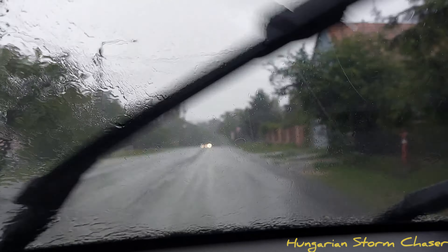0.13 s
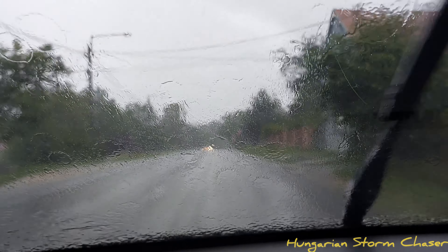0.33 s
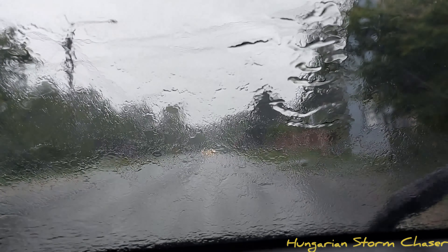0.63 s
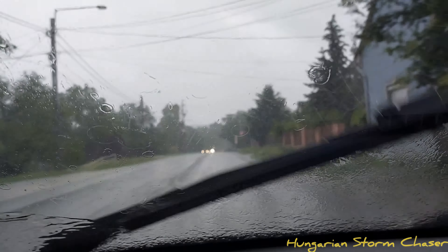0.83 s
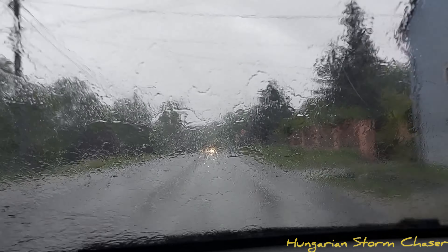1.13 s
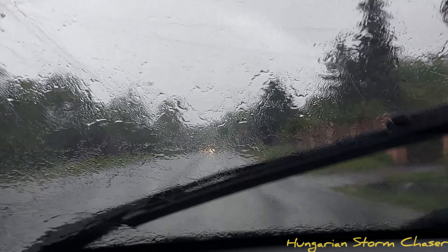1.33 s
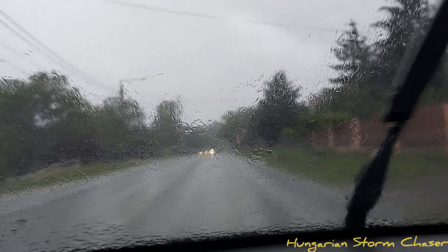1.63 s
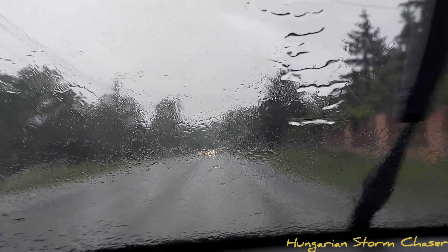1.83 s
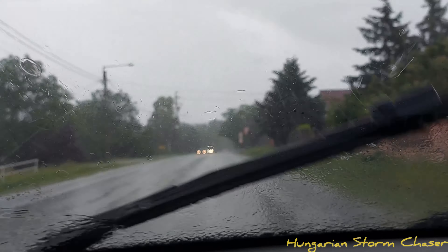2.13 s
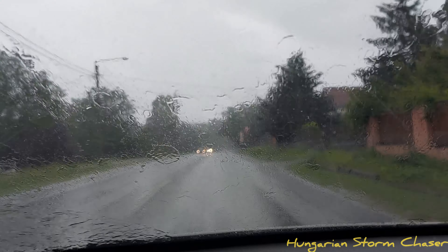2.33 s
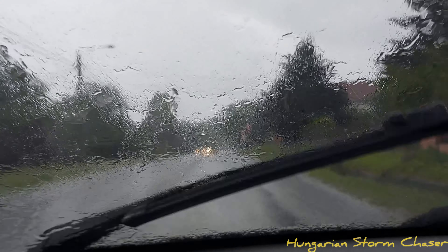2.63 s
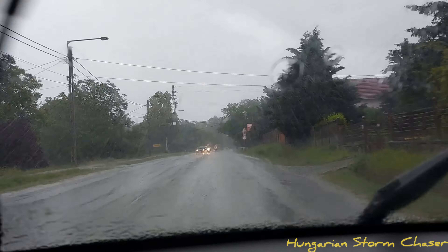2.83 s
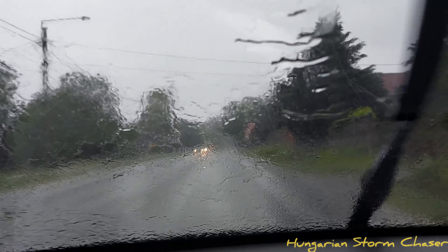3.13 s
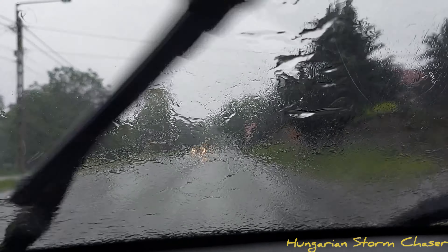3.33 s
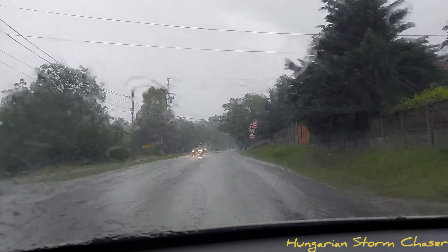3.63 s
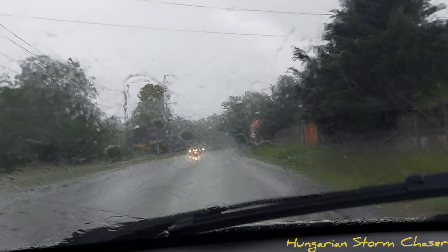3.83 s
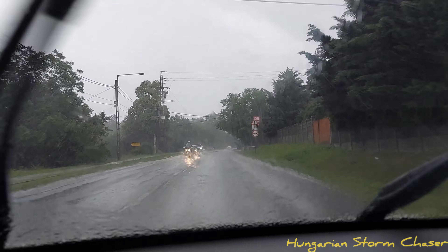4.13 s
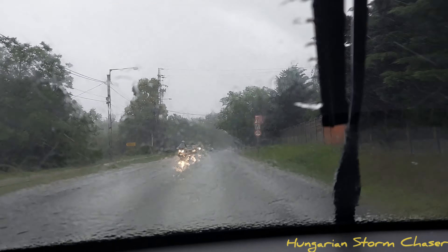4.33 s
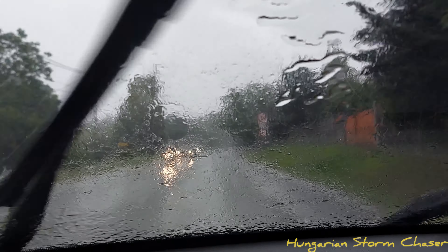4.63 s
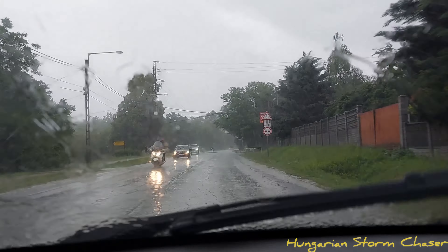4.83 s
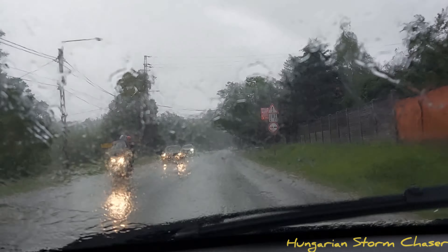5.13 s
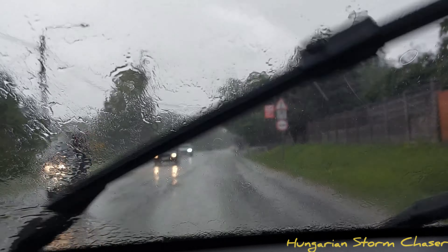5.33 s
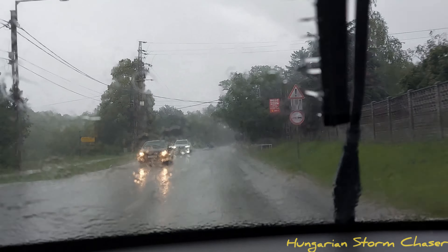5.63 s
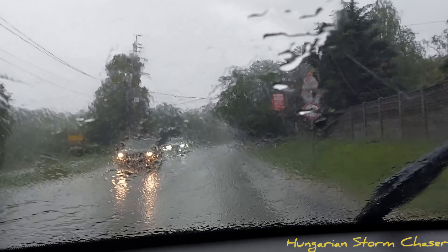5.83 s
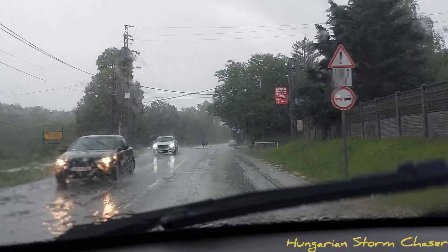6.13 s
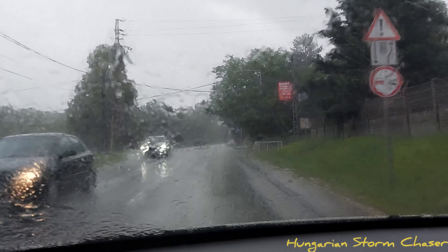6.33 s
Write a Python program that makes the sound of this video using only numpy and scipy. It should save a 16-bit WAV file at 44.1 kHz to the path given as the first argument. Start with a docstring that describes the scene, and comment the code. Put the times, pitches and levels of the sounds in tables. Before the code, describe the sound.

Inside a car driving through heavy rain, dense drops drum on the lined steel roof while fainter, sharper ticks hit the windscreen. Single fat drops snap out irregularly. A steady low engine hum and muffled wet tyre roar run underneath. Rough road booms briefly near two seconds and more strongly near five, each with a dull knock. The microphone is in the cabin, close to the rain, in slightly right-heavy stereo.

```python
"""Heavy rain drums on a car roof and ticks on the windscreen, heard from inside, with single fat drops standing out.
Each drop is a short burst of noise that snaps, cracks and rings; about two thousand land every second.
The engine hums on one steady pitch from three sine tones, its firing tone rising and falling in level.
Below it, filtered noise makes the rumble of the road and the wash of wet tyres. Rough patches boom on a
sinking note, and two dull knocks ring in the car body."""
import sys
import numpy as np
from scipy import signal
from scipy.fft import rfft, irfft, next_fast_len
from scipy.io import wavfile
from scipy.ndimage import uniform_filter1d

SR = 44100
rng = np.random.default_rng(int(sys.argv[2]) if len(sys.argv) > 2 else 0)


def wav_out(sig):
    """Save sig, one row per channel (or a flat mono array), as 16-bit PCM at SR to the path in sys.argv[1]."""
    wavfile.write(sys.argv[1], SR, np.round(np.clip(np.atleast_2d(sig).T, -1, 1) * 32767).astype(np.int16))


N = 285327
T = np.arange(N) / SR  # time of every sample in seconds


def undb(db):
    """Turn decibels into a gain."""
    return 10 ** (np.asarray(db) / 20)


def curves(table):
    """Join the points of each table column by straight lines in time."""
    seconds, *columns = np.transpose(table)
    return [np.interp(T, seconds, column) for column in columns]


def unit(x):
    """Scale a sound to an average (rms) strength of 1."""
    return x / np.sqrt(np.mean(x ** 2))


def colour(points, hz):
    """Read the gain at any frequency from a tone-colour table of Hz and dB."""
    point_hz, point_db = np.transpose(points)
    return undb(np.interp(np.log(hz + 1), np.log(point_hz), point_db))


def shape(x, gain):
    """Filter a sound by a gain for each frequency, with no echo ahead of the sound (minimum phase)."""
    size = next_fast_len(x.shape[-1] // 2 + 4096) * 2
    hz = np.arange(size // 2 + 1) * SR / size
    cepstrum = irfft(np.log(gain(hz) + 1e-6))
    # folding the second half onto the first moves all the response after time zero
    cepstrum[1:size // 2] *= 2
    cepstrum[size // 2 + 1:] = 0
    response = np.exp(rfft(cepstrum))
    return irfft(rfft(x, size) * response, size)[..., :x.shape[-1]]


def walk(rate):
    """Drift at random: levels drawn `rate` times a second, smoothed twice and scaled to rms 1."""
    hold = max(int(SR / rate), 2)
    steps = np.repeat(rng.standard_normal(N // hold + 1), hold)
    smooth = uniform_filter1d(uniform_filter1d(steps, hold), hold)
    return unit(smooth[:N])


def diffuse(pair, alike_hz):
    """Send two unrelated sounds left and right; long waves (low notes) reach both sides alike."""
    def likeness(hz):
        return 1 / (1 + (hz / alike_hz) ** 2) ** 2
    mid = shape(pair[0], lambda hz: np.sqrt(1 + likeness(hz)))
    side = shape(pair[1], lambda hz: np.sqrt(1 - likeness(hz)))
    return np.array([mid + side, mid - side])


def splat(crack_s, ring_t60, ring_db, snap_db):
    """A drop hits a panel: a snap, a short crack, then noise for dense panel modes and cabin reflections."""
    t = T[:4096]
    snap = undb(snap_db) * np.exp(-t / .0003)
    crack = np.exp(-t / crack_s)
    ring = undb(ring_db - 60 * t / ring_t60)  # ring_t60: seconds to fade by 60 dB
    fade = snap + crack + ring
    return rng.standard_normal((2, len(t))) * fade / np.sqrt(np.sum(fade ** 2))


def shower(per_s, spread_db, spots):
    """Drops of scattered sizes land at random times on the given spots, each with its own ring."""
    out = 0
    for spot in spots:
        # the cap on size: larger drops break up in the air
        sizes = undb(spread_db * np.minimum(rng.standard_normal(4096), 2))
        lands = np.flatnonzero(rng.random(N) < per_s / len(spots) / SR)[:len(sizes)]
        blows = np.bincount(lands, sizes[:len(lands)], N)
        out = out + signal.oaconvolve(blows[None], spot, axes=1)[:, :N]
    return out


# Tone of a drop through the steel roof. Each row: frequency in Hz, gain in dB.
ROOF_TONE = [(200, -9), (450, -1), (640, 2.5), (1000, -9), (1160, -1), (1450, -1.5), (2000, 0), (2700, 0),
             (3250, -3), (3800, -1.5), (4500, -5), (5200, -11), (7100, -12.5), (8600, -22.5),
             (15000, -17.5)]


def roof(rain_db, count=16):
    """Dense drumming: many small hits on the steel, dulled by the roof lining."""
    spots = [splat(crack_s=.0024, ring_t60=.1, ring_db=-3, snap_db=4) for _ in range(count)]
    patter = shower(per_s=1750, spread_db=5.5, spots=spots)
    patter = shape(diffuse(patter, alike_hz=840), lambda hz: colour(ROOF_TONE, hz))
    return unit(patter) * undb(rain_db)


# Tone of a drop on the glass. Each row: frequency in Hz, gain in dB.
GLASS_TONE = [(500, -27), (1500, -4), (2600, 2.5), (3300, -3.5), (4400, 1.5), (5200, -0.5), (7200, -1),
              (8300, -7.5), (9400, -7.5), (11000, -4), (12800, -5), (14500, -8), (16000, -6.5)]


def windscreen(rain_db, count=20):
    """Sparser, sharper ticks: bare glass rings more briefly than the roof."""
    spots = [splat(crack_s=.0018, ring_t60=.055, ring_db=-4, snap_db=4.5) for _ in range(count)]
    ticks = shower(per_s=520, spread_db=7, spots=spots)
    return unit(shape(ticks, lambda hz: colour(GLASS_TONE, hz))) * undb(rain_db)


# Single fat drops. Each row: start in seconds, peak in dB before the left-right balance,
# share that strikes bare glass (0 is all roof, 1 is all glass).
FAT_DROPS = [(0.2604, -25, 1), (0.4258, -21, 1), (0.578, -23, 0.4), (0.655, -20.5, 0.9), (0.7733, -20, 0.9),
             (1.3253, -17, 0), (1.985, -27, 0.5), (2.8589, -17, 0.2), (3.1816, -21, 1), (3.416, -15.5, 1),
             (3.8384, -24, 0.2), (4.0182, -24, 0.6), (4.0997, -18, .6), (4.266, -27, .3), (4.3126, -27, .8),
             (4.4806, -14.5, 0.07), (4.714, -18.5, .15), (4.8388, -24, 0.5), (4.9066, -14, 0),
             (5.213, -18, 0.02), (5.3948, -18, .1), (5.522, -23, 1), (5.9188, -18, 0), (6.1788, -29, 1),
             (6.2312, -23, 0.8), (6.3786, -19, 0)]


def fat_drops():
    """Single heavy drops: bright ones strike the bare glass, dull ones the lined roof."""
    out = np.zeros((2, N + 4096))
    for start_s, peak_db, on_glass in FAT_DROPS:
        def tone(hz):
            return on_glass * colour(GLASS_TONE, hz) + (1 - on_glass) * colour(ROOF_TONE, hz)
        hit = shape(splat(crack_s=.0022, ring_t60=.06, ring_db=-7, snap_db=-1), tone)
        start = int(start_s * SR)
        out[:, start:start + hit.shape[1]] += hit / np.abs(hit).max() * undb(peak_db)
    return out[:, :N]


def staggered(pair):
    """Patter straight from the panels reaches the left first; part of it reaches the right a moment later."""
    share, lag_s = .097, .00055
    late = np.roll(pair[0], int(lag_s * SR))
    return np.array([pair[0], np.sqrt(1 - share ** 2) * pair[1] + share * late])


# Strength of the rain. Each row: time in seconds, roof level in dB, windscreen level in dB.
RAIN_STRENGTH = [(0, -33.5, -43), (0.18, -36.5, -46.0), (0.3, -34.5, -41.5), (0.55, -35.5, -44.5),
                 (0.8, -33.5, -41.5), (1.1, -35.5, -45), (2.05, -36.0, -46.5), (2.42, -35.5, -45.5),
                 (2.75, -36.5, -46), (3.55, -34.5, -45), (4.05, -36, -45.5), (4.22, -36.5, -50),
                 (4.56, -38.5, -50.5), (4.72, -34, -53.5), (4.9, -35.5, -41), (4.98, -39, -50.0),
                 (5.75, -37.5, -49), (6.47, -36.5, -44.5)]
# quick flurries, felt most on the glass
FLURRIES_PER_S, ROOF_FLURRY_DB, GLASS_FLURRY_DB = 20, .7, 1.6


def rain():
    """All the drops together; roof and glass swell with the same random flurries."""
    roof_db, glass_db = curves(RAIN_STRENGTH)
    flurry = walk(FLURRIES_PER_S)
    drumming = roof(roof_db + ROOF_FLURRY_DB * flurry)
    ticking = windscreen(glass_db + GLASS_FLURRY_DB * flurry)
    return staggered(drumming + ticking + fat_drops())


# Engine load, heard in the firing tone. Each row: time in seconds, level in dB.
ENGINE_LOAD = [(0, -27), (1.8, -25.5), (2.0, -27), (2.3, -29), (3.7, -23), (4.4, -26.5), (4.7, -32),
               (5.3, -26), (5.6, -29), (6.47, -31)]
FIRING_HZ = 56.6
DRONE_DB = -29.5  # the drone keeps its level whatever the load
# random drift in level, as the road shakes the car
FIRING_WAVER_DB, DRONE_WAVER_DB, WAVER_PER_S = 1.14, 2, 14


def engine():
    """A smooth four-cylinder hum: the firing tone, a drone at twice its pitch and a faint tone at three times."""
    load_db, = curves(ENGINE_LOAD)
    phase = 2 * np.pi * FIRING_HZ * T
    firing = np.cos(phase) * undb(load_db + FIRING_WAVER_DB * walk(WAVER_PER_S))
    waver = .15 * walk(4)  # shifts the upper tones slightly, in radians
    drone = np.sin(2 * phase + waver) * undb(DRONE_DB + DRONE_WAVER_DB * walk(WAVER_PER_S))
    third = np.cos(3 * phase + waver) * undb(load_db - 14 + 2 * walk(10))
    return np.sqrt(2) * (firing + drone + third)  # the root makes the levels rms


# Water on the road, with a puddle in the first second. Each row: time in seconds, tyre roar in dB.
ROAD_WATER = [(0, -30), (.3, -31.5), (.8, -29.5), (1.15, -31), (2.6, -31.5), (3.6, -31), (4.8, -30.5),
              (5.7, -33), (6.47, -31.5)]
# Tone of the tyre roar in the cabin. Each row: frequency in Hz, gain in dB.
TYRE_TONE = [(18, -28.5), (32, -4.5), (46, 7), (100, 0.5), (140, 5.5), (190, 0.5), (245, 1.5), (295, -4.5),
             (360, -6), (450, -4), (540, -13), (650, -16.5), (800, -12.5), (1300, -21), (4000, -39.5)]
FLUTTER_DB = .9


def tyres():
    """Wet tread roars as filtered noise, swelling and fluttering with the film of water."""
    wash_db, = curves(ROAD_WATER)
    noise = diffuse(rng.standard_normal((2, N)), alike_hz=846)
    roar = shape(noise, lambda hz: colour(TYRE_TONE, hz))
    return unit(roar) * undb(wash_db + FLUTTER_DB * walk(14))


# Low cabin booms that the road excites. Each row: frequency in Hz, width in Hz, relative level in dB.
CABIN_BOOMS = [(80.4, 14.8, 3.5), (103.1, 7.4, -3), (126.6, 13.8, -3.5)]
# Smooth stretches of road. Each row: start in seconds, end in seconds, change of rumble in dB.
SMOOTH_STRETCHES = [(-.1, .3, -4), (.75, 1.165, -13), (2.33, 2.898, -8), (3.5, 4.2, -3.5), (4.42, 4.9, -3),
                    (5.498, 6.6, -4)]
# rumble of ordinary asphalt: level, how much and how often its grain changes
ROAD_DB, UNEVEN_DB, UNEVEN_PER_S = -29, 1.4, 14
SURFACE_CHANGE_S = .1  # time to roll onto a new surface
JOLT_DB = 3.5  # extra rumble while the car is shaken hardest


def road(shaken):
    """The grain of the asphalt shakes the suspension and rings the cabin's low resonances."""
    rough_db = ROAD_DB + UNEVEN_DB * walk(UNEVEN_PER_S) + JOLT_DB * shaken
    for start, end, db in SMOOTH_STRETCHES:
        on_it = np.clip(np.minimum(T - start, end - T) / SURFACE_CHANGE_S, 0, 1)
        rough_db = rough_db + db * on_it

    def resonances(hz):
        return sum(undb(db) / (1 + ((hz - f) / width) ** 2) ** 2 for f, width, db in CABIN_BOOMS)
    booms = unit(shape(rng.standard_normal(N), resonances))
    # even out the noise's own swells, so that the road's roughness sets the strength
    booms = booms / np.sqrt(uniform_filter1d(booms ** 2, size=3500) + .024)
    return unit(booms) * undb(rough_db)


# Rough patches of road. Each row: start in seconds, end in seconds, boom in Hz, boom level in dB.
ROUGH_PATCHES = [(1.73, 1.92, 92, -25.5), (4.908, 5.263, 101, -20)]
ATTACK_S, RELEASE_S = .023, .076
SINK, WOBBLE = .16, .0688  # shares of the boom's pitch: total fall, and random unsteadiness
TRIM_HZ, TRIM_WIDTH_HZ, TRIM_DB = 189, 80, -12  # trim buzz: centre, width, level against the boom
SETTLE_S = .27  # the suspension settles after a patch


def patches():
    """Over broken asphalt the cabin booms on one sinking sine while the trim buzzes above it as a band of noise."""
    out = 0
    for start, end, hz, db in ROUGH_PATCHES:
        along = np.clip((T - start) / (end - start), 0, 1)
        swell = np.clip(np.minimum((T - start) / ATTACK_S, (end - T) / RELEASE_S), 0, 1)
        pitch = hz * (1 + SINK * (.5 - along) + WOBBLE * walk(40))
        boom = np.sqrt(2) * np.sin(2 * np.pi * np.cumsum(pitch) / SR)
        noise = rng.standard_normal(N)
        buzz = unit(shape(noise, lambda f: 1 / (1 + ((f - TRIM_HZ) / TRIM_WIDTH_HZ) ** 4)))
        out = out + swell * undb(db) * (boom + undb(TRIM_DB) * buzz)
    return out


def jolt():
    """How hard the rough patches shake the car, 0-1: held while on a patch, then dying away."""
    strongest = max(db for *_, db in ROUGH_PATCHES)
    shaken = 0
    for start, end, _, db in ROUGH_PATCHES:
        rise = np.clip((T - start) / ATTACK_S, 0, 1)
        settle = np.exp(-np.maximum(T - end, 0) / SETTLE_S)
        shaken = shaken + undb(db - strongest) * rise * settle
    return shaken


# Dull knocks in the car body. Each row: start in seconds, ring in Hz, level in dB.
BODY_KNOCKS = [(2.116, 792, -25), (4.906, 740, -33)]


def knocks():
    """Short hollow knocks, each ringing three close body modes that fade by 60 dB in 0.069 s."""
    out = 0
    for start, hz, db in BODY_KNOCKS:
        age = np.maximum(T - start, 0)
        ring = sum(np.sin(2 * np.pi * hz * ratio * age) for ratio in (.94, 1, 1.09)) / 3
        out = out + ring * undb(db - 60 * age / .069)
    return out


# Tone balance between the sides: the right is louder in most bands.
# Each row: frequency in Hz, left minus right in dB.
SIDE_BALANCE = [(60, -2.5), (350, -2.5), (620, -4), (1050, -3.5), (1500, -6), (2700, -2.5), (3700, -5),
                (4400, -10.5), (5500, 4.5), (7000, -7.5), (8400, 2), (10500, -6.5), (13000, -11.5),
                (16000, -7.5)]


def scene():
    """Mix rain, engine, road and knocks, then tilt the tone between left and right."""
    cabin = rain() + engine() + tyres() + road(jolt()) + patches() + knocks()
    # each side takes half of the difference
    left = shape(cabin[0], lambda hz: np.sqrt(colour(SIDE_BALANCE, hz)))
    right = shape(cabin[1], lambda hz: 1 / np.sqrt(colour(SIDE_BALANCE, hz)))
    return np.array([left, right])


def record(dry):
    """Cut the top of the treble with a steep low-pass filter at 15900 Hz."""
    low_pass = signal.ellip(10, .2, 80, 15900, fs=SR, output="sos")
    return signal.sosfilt(low_pass, dry)


dry = scene()
out = record(dry)
wav_out(out)
```